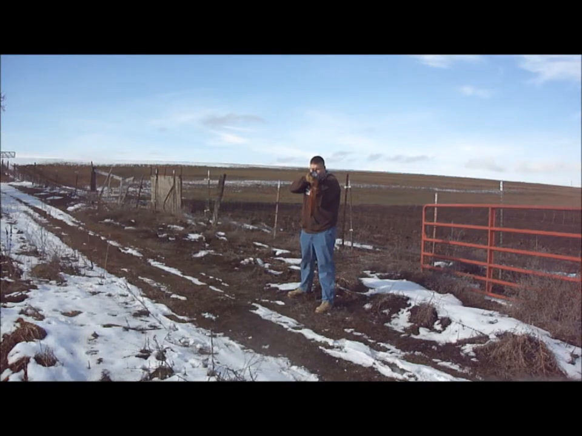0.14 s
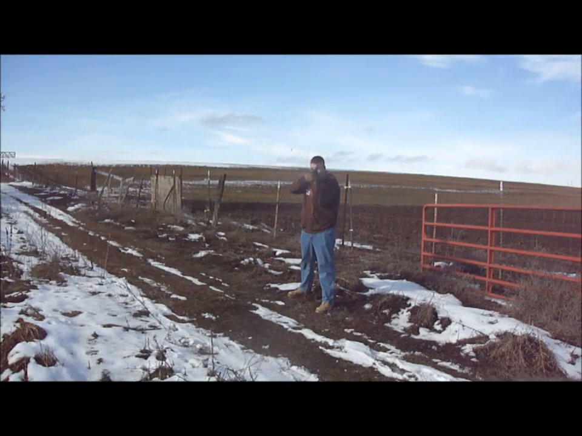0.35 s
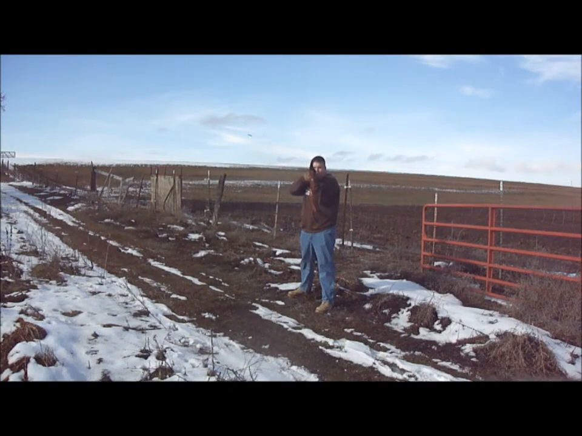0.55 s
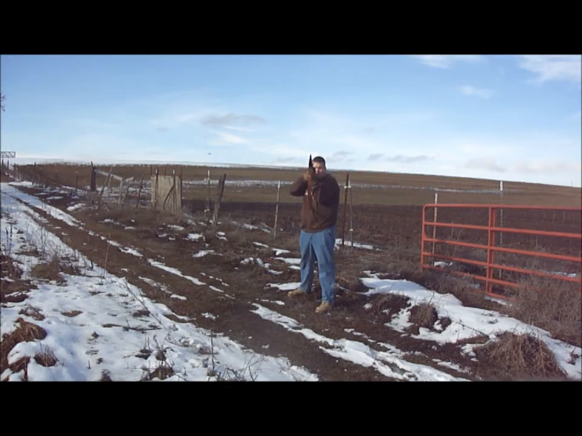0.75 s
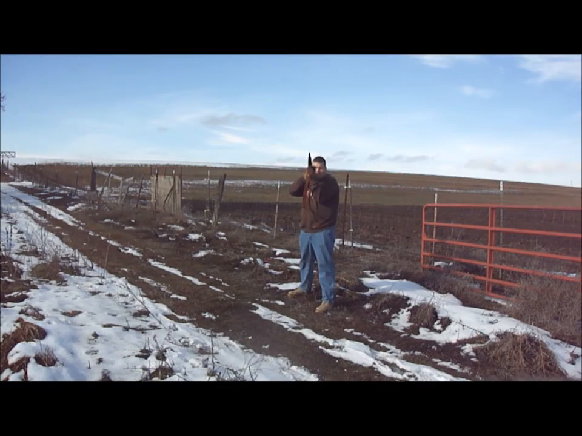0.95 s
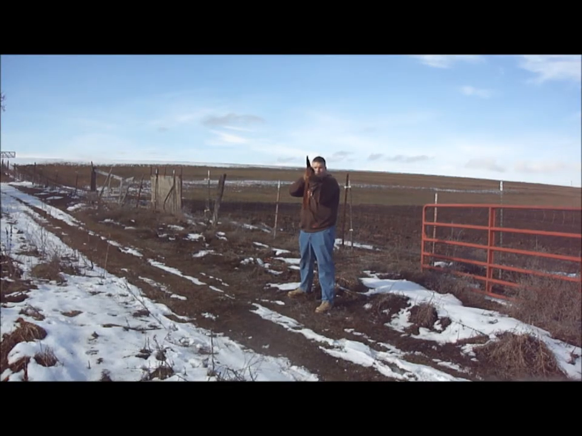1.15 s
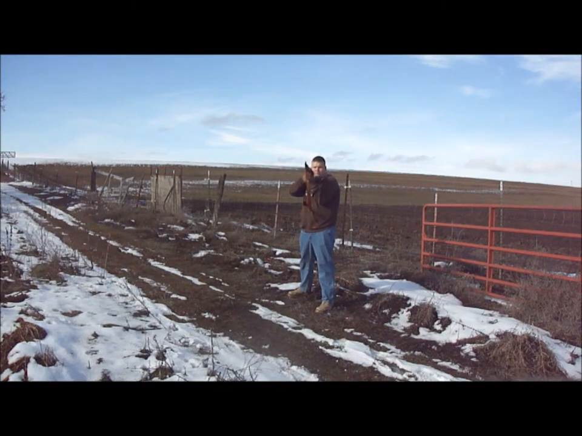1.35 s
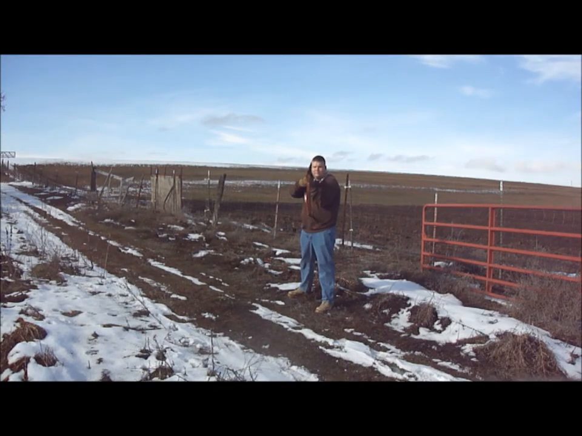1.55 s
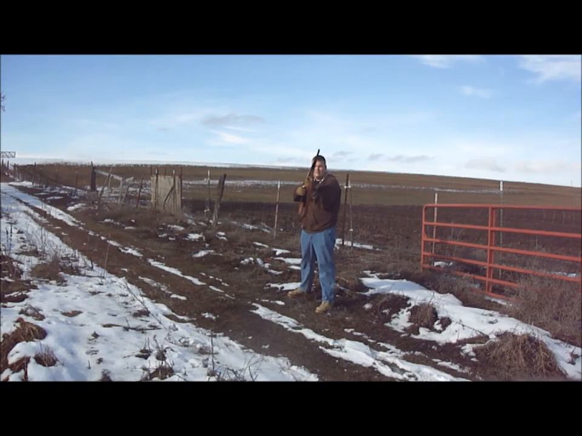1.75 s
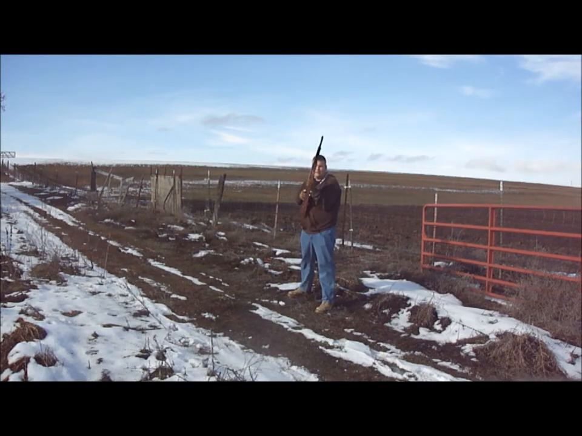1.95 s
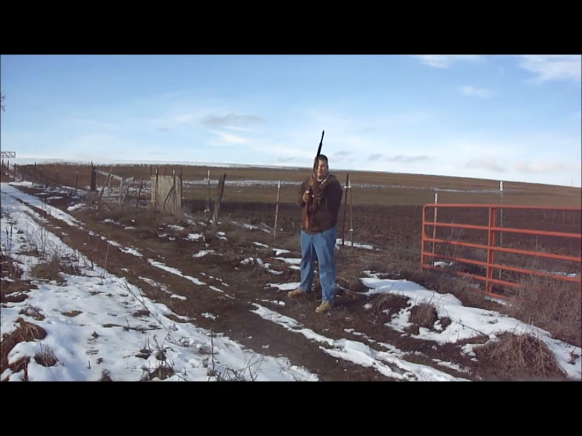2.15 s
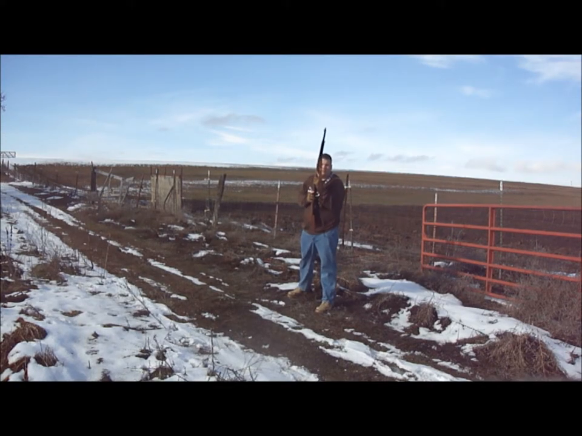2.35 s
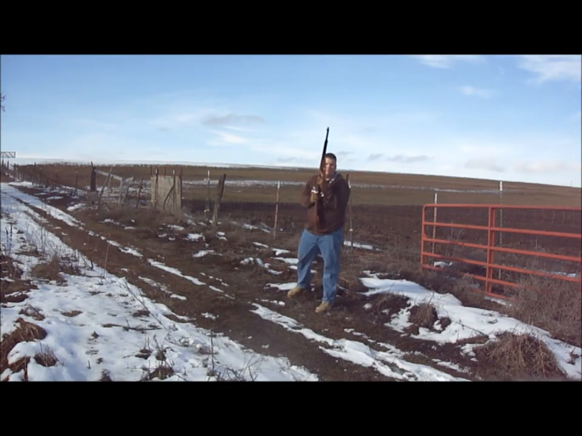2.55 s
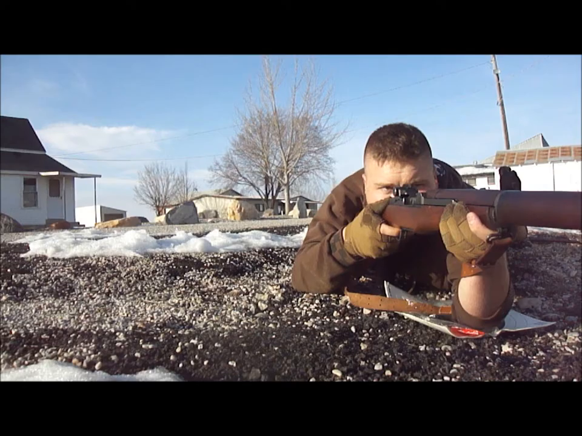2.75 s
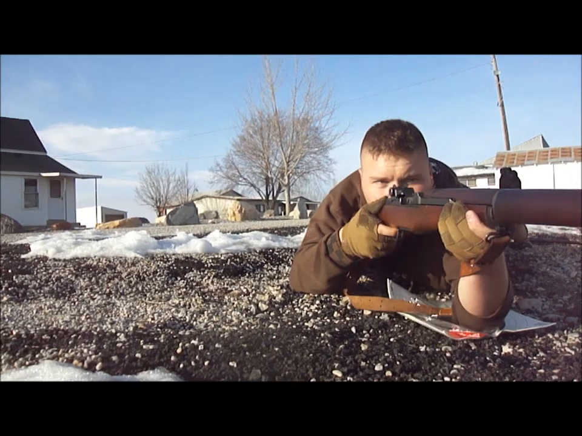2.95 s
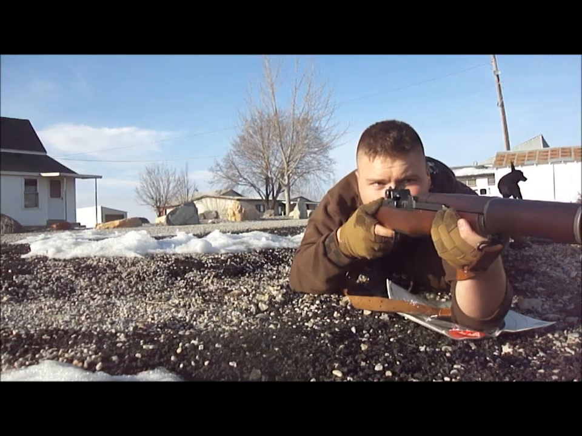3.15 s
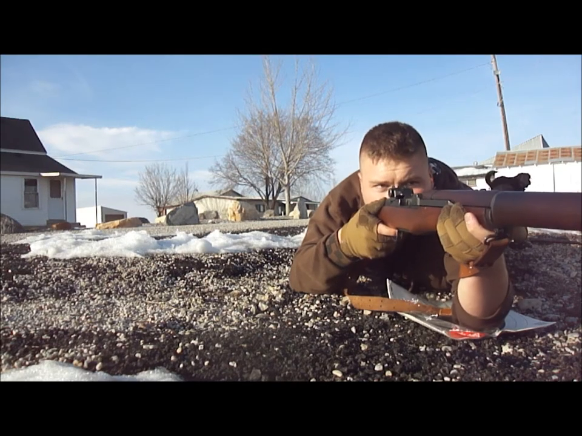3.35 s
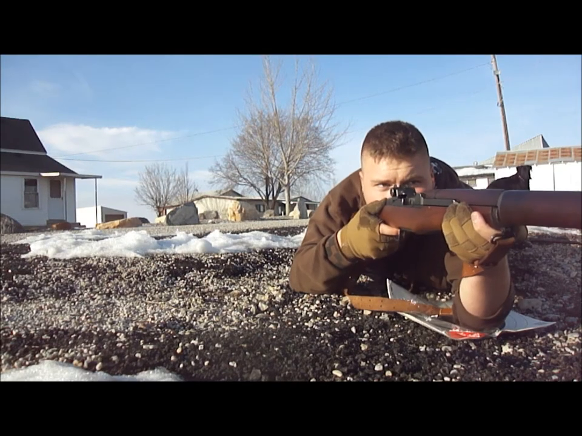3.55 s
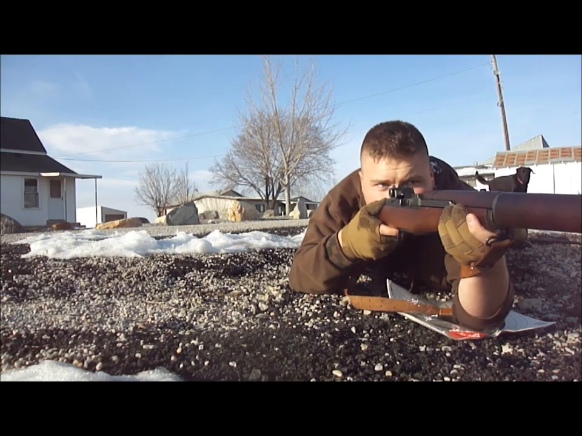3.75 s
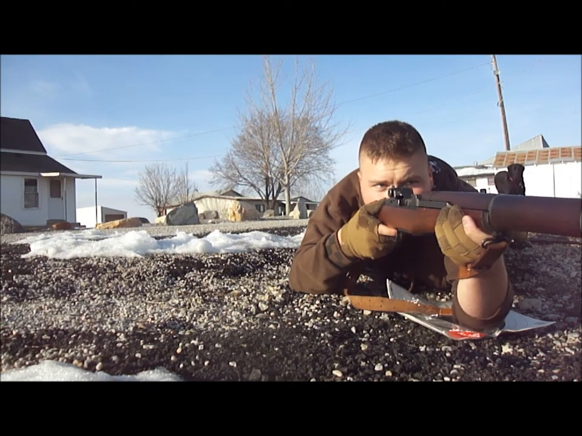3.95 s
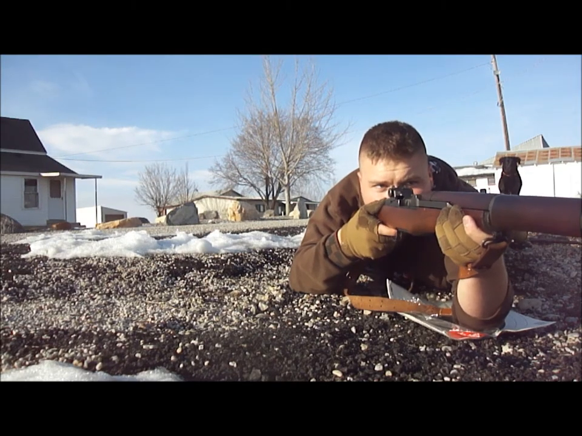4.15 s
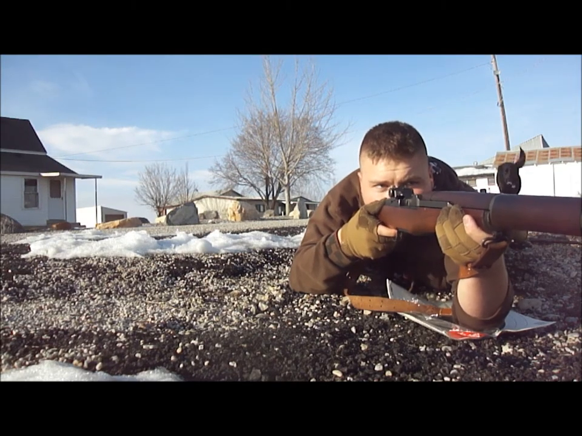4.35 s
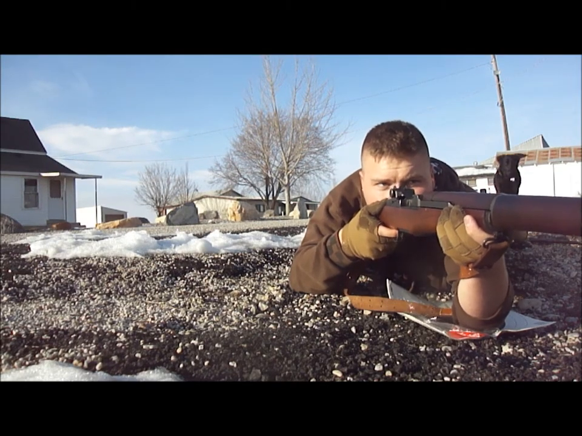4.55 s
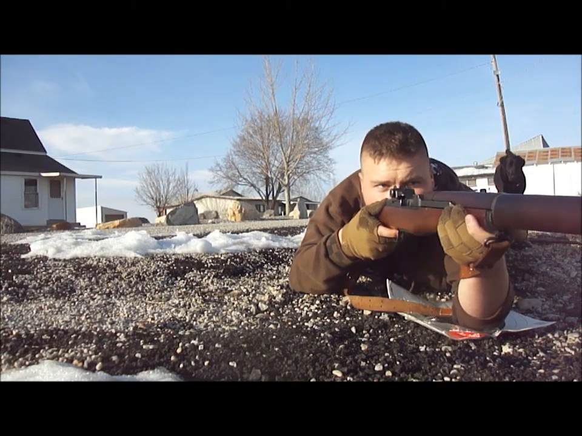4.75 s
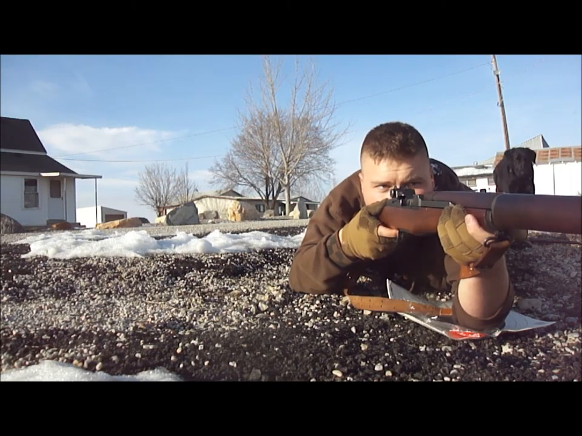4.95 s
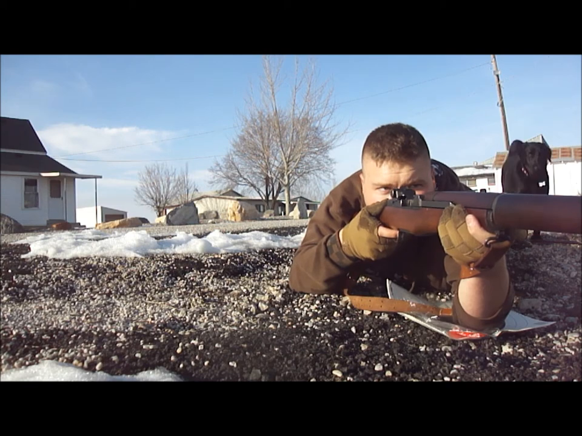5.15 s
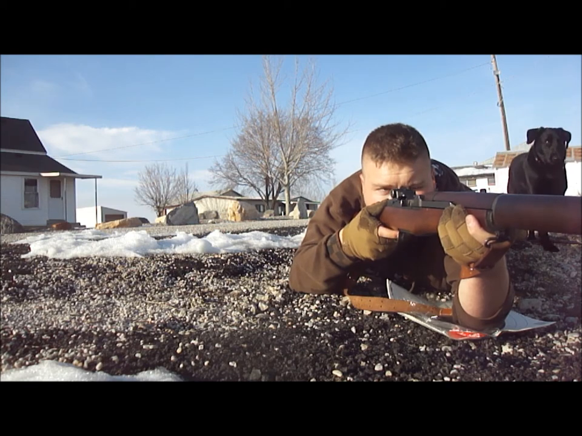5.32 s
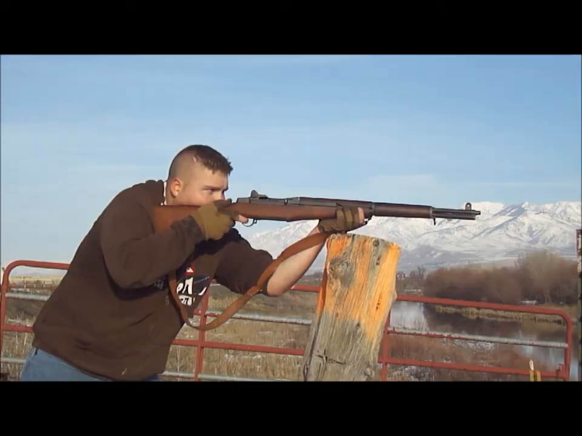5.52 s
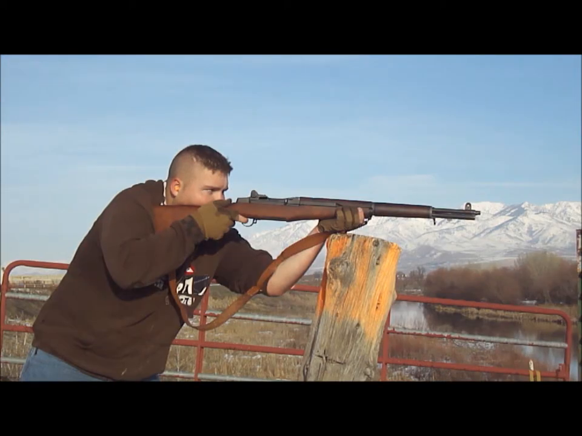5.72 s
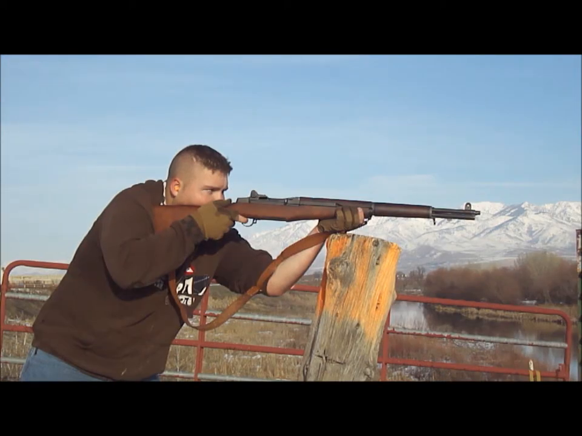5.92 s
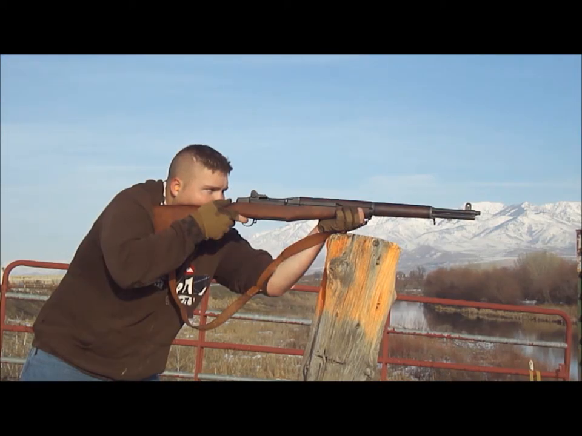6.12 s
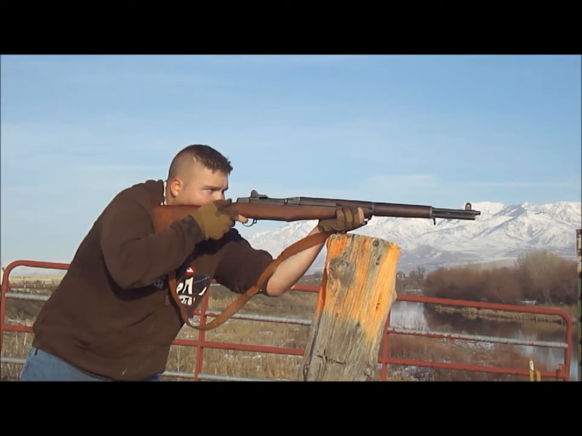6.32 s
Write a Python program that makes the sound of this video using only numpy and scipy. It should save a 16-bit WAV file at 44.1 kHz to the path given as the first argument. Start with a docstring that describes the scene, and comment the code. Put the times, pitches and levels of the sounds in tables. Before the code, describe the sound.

A sharp rifle crack echoes over fields with a ringing steel clip, then a second shot booms in a yard, casing bouncing, before near silence.

```python
"""Two rifle shots in open farmland

Heard from beside the rifle: a shot in the fields and one in a yard, joined by hard cuts, then a quiet field.
Each is a crack and a blast, made of noise bursts and N-waves; shaped noise rolls back from ground and hills.
After the first an empty steel cartridge clip pings away and lands, as wavering modes; after the second
nearby steel sings on and the brass case bounces on gravel by the microphone, as decaying sines.
Air puffs reach the microphone over faint open air; the recorder's limiter ducks after every loud peak."""
import sys
import numpy as np
from scipy import signal
from scipy.fft import rfft, irfft
from scipy.io import wavfile
from scipy.ndimage import uniform_filter1d

SR = 44100
rng = np.random.default_rng(int(sys.argv[2]) if len(sys.argv) > 2 else 0)


def waveform_to_disk(signal):
    """Save audio, clipped to [-1, 1], as 16-bit WAV at the path in sys.argv[1]."""
    frames = np.transpose(np.atleast_2d(signal))
    scaled = np.clip(frames, -1, 1) * 32767
    samples = np.round(scaled).astype(np.int16)
    wavfile.write(sys.argv[1], SR, samples)


N = 281358
TIME = np.arange(N) / SR
FREQS = np.maximum(np.fft.rfftfreq(N, 1 / SR), 1)

# Open air at the microphone, relative spectrum: (frequency [Hz], level [dB per Hz])
AIR_COLOUR = [(18, -41), (30, -28), (64, -4.5), (153, -5), (363, -5), (391, -3.5), (476, -3.5), (526, -5.5),
              (1410, -10.5), (2620, -15.5), (5910, -18.5), (11000, -21.5), (14200, -59), (22000, -120)]
AIR_DB, YARD_AIR_RISE_DB = -50.5, 0.5   # the air is slightly louder during the second take

# Puffs of air on the microphone, before their flutter: (time [s], level [dB], length [s])
PUFFS = [(0.065, -28, .068), (2.148, -45, 0.025), (2.583, -47, 0.055), (2.95, -27.5, 0.504),
         (5.535, -54, .028)]
# Relative spectrum of a puff: (frequency [Hz], level [dB per Hz])
PUFF_COLOUR = [(24, -47), (40, -37), (139, -2.5), (219, -2.5), (247, -1), (324, -4.5), (389, -15),
               (519, -18.5), (1500, -54), (1950, -99), (3300, -120)]
PUFF_ATTACK_S, PUFF_RELEASE_S = 0.0051, 0.018

# A soft knock on the camera; its mode: (frequency [Hz], level [dB], t60 [s])
KNOCK_S, KNOCK_MODE = 0.0775, (600, -10, 0.015)

# Bits of thrown gravel falling back: (time [s], level [dB])
GRAVEL = [(3.871, -28.5), (3.889, -27.5), (4.015, -34), (4.125, -33.5)]
GRAVEL_HZ, GRAVEL_DECAY_S = 7800, 0.0011

# (time [s], level [dB], centre frequency [Hz], decay [s])
CLICKS_AND_SCUFFS = [(1.235, -41, 8200, 0.015), (1.812, -39, 7000, 0.016), (1.847, -24.5, 5600, 0.0094),
                     (1.965, -42, 3640, .007), (2.428, -43, 3900, .003), (3.6204, 10, 9100, 0.00093),
                     (3.64, -34, 5500, 0.096), (4.899, -45, 7000, .0085), (5.086, -42, 2900, 0.048),
                     (5.348, -26.5, 4700, .0063), (5.881, -36, 6500, .0032)]

# Modes of each tick in a faint whirr, before the whirr level: (frequency [Hz], level [dB], t60 [s])
WHIRR_MODES = [(3600, 3.5, 0.018), (5700, 3, .012), (6800, 3, 0.0098), (7600, -3, .012)]
WHIRR_START_S, WHIRR_END_S, WHIRR_SWELL_S, WHIRR_DB = 2.2, 2.66, 0.28, -48

# Modes of the brass case, before the level of each bounce: (frequency [Hz], level [dB], t60 [s])
CASE_MODES = [(9250, -16, 0.073), (10030, 6.5, 0.027), (10300, -9, 0.18), (10900, -14, .06)]
# The case bounces and rolls: (time [s], level [dB])
CASE_HITS = [(3.62, -14), (3.707, -34), (3.727, -31), (3.751, -39), (3.7694, -28.5), (4.35, -42),
             (4.395, -47), (4.725, -45)]

# Steel set singing by the second blast: (frequency [Hz], level [dB], t60 [s])
STEEL_MODES = [(1569, -23.5, 5.8), (1661, -25.5, 6.4)]

# Modes of the steel cartridge clip, before the level of each ring: (frequency [Hz], level [dB], t60 [s])
CLIP_MODES = [(2383, 4, 1), (4079, 0.5, 1), (4988, -4.5, 0.34), (5077, -8.5, 1), (5090, -8, 0.68),
              (5570, -7, 0.91), (6360, -9, 0.14), (7060, -7, 0.37), (7630, -18, 0.74), (8000, -18, 0.3),
              (8430, -17.5, 1), (10100, -4.5, 0.17), (10300, -3, 0.33)]
# (time [s], level [dB], favoured frequency [Hz], spread [octaves], time until damped [s])
CLIP_RINGS = [(0.45, -19.5, 3980, 0.26, 0.16), (0.485, -15.5, 7820, 0.056, 0.15),
              (0.529, -25, 2430, 0.4, 0.078), (0.578, -12, 4950, .088, 0.045),
              (0.658, -23, 8060, 0.6, 0.17), (0.79, -9, 6350, 0.051, .032), (0.79, -12, 8400, 0.046, 0.038),
              (0.83, -15, 7100, 0.24, 0.18), (0.919, -22, 4760, 0.57, 0.18), (1.062, -24, 5070, .12, .1),
              (1.849, -36, 4640, 0.46, 0.095), (1.96, -51, 4600, .25, 0.17),
              (2.095, -27, 6400, 0.04, 0.018)]

# The two takes, the first in the fields and the second in the yard: (muzzle blast [s], end of take [s])
SHOT_TIMES = [(0.2823, 2.70), (2.808, 5.37)]
# Relative colour of the early echoes in the fields: (frequency [Hz], level [dB per Hz])
FIELD_COLOUR = [(24, -76), (40, -44), (164, -14.5), (256, -12), (419, -5), (624, 1), (1150, -1),
                (1290, -2.5), (1600, -4.5), (2610, -5), (4180, -12.5), (4700, -16), (5170, -18.5),
                (11000, -41), (14200, -74), (22000, -120)]
# Relative colour of the early echoes in the yard: (frequency [Hz], level [dB per Hz])
YARD_COLOUR = [(24, -68), (40, -41), (156, -5.5), (250, 1.5), (309, 1), (482, -3), (568, -6), (639, -6),
               (1180, -8), (1520, -5.5), (4080, -13.5), (4490, -13.5), (10200, -33.5), (11000, -37),
               (14200, -57), (22000, -120)]
# Sharp single slaps from walls and banks, before a common gain: (time [s], level [dB])
SLAPS = [(0.366, -2), (0.37, -12), (0.422, -7.5), (0.461, -4), (0.516, 1), (1.183, 1), (1.354, -13),
         (1.460, -7.5), (1.801, -14), (2.057, -11.5), (2.353, -22.5), (2.547, -25), (2.823, 2), (2.832, 1),
         (2.856, 4.5), (2.982, -15), (3.010, -2.5), (3.084, -4), (3.221, -8), (4.395, -17), (4.445, -16.5),
         (4.821, -21), (4.929, -20)]
SLAP_GAIN_DB = -11
# Smeared swells from slopes and tree lines, before the colouring: (time [s], level [dB], spread [s])
SWELLS = [(0.295, -10, .012), (0.369, -7.5, 0.0024), (0.521, -17.5, 0.011), (0.636, -11, 0.017),
          (0.721, -15.5, 0.016), (0.83, -17.5, 0.032), (1.14, -21.5, 0.055), (1.353, -23, 0.045),
          (1.465, -27.5, 0.048), (1.649, -25.5, 0.019), (1.709, -24, 0.0085), (1.79, -21.5, 0.015),
          (1.865, -24.5, 0.012), (2.023, -27.5, 0.027), (2.112, -28, 0.015), (2.272, -29, 0.015),
          (2.368, -34, 0.015), (2.46, -34.5, 0.023), (2.56, -37.5, 0.018), (2.69, -34, 0.0037),
          (2.827, -23, 0.016), (2.88, -11, 0.0045), (3.03, -24, 0.11), (3.298, -14, 0.011),
          (3.322, -15.5, .008), (3.509, -21, 0.021), (3.757, -22.5, .018), (3.91, -27.5, 0.018),
          (4.37, -32, 0.053)]
# The bullet's crack, the muzzle blast and their first spray off the ground:
# (time [s], level [dB], centre frequency [Hz], decay [s])
CRACKS = [(0.2752, -1, 4970, 0.00029), (0.2766, 5, 5300, 0.001), (0.2776, 0.5, 800, 0.00081),
          (0.286, -26, 5000, 0.0099), (2.806, -19.5, 5000, .006), (2.8136, 3, 1980, 0.00039),
          (2.875, -11, 5100, 0.012), (2.932, -12.5, 3950, 0.0059), (2.955, -18, 6000, .003)]

# Near ground scatter fades from the blast on. The far land answers after a delay, holds,
# then loses far_fall_db with every doubling of the travel time.
FIELD_ECHO = dict(near_db=-14, near_fade_db_per_s=34, far_db=-17.5,
                  far_delay_s=0.33, far_hold_s=0.7, far_fall_db=16.5)
YARD_ECHO = dict(near_db=-21, near_fade_db_per_s=9, far_db=-24,
                 far_delay_s=0.39, far_hold_s=0.56, far_fall_db=13.5)
FAR_RISE_S = 0.0081
# Treble loss [dB per kHz] at first, its growth and its limit; boom under 300 Hz relative to the roar.
FIELD_TONE = dict(first_loss_db=-2.0, loss_db_per_s=6, most_loss_db=9,
                  boom_db=-12, boom_fade_db_per_s=8, patchy_db=0.74)
YARD_TONE = dict(first_loss_db=-1.5, loss_db_per_s=5.5, most_loss_db=5,
                 boom_db=-11.5, boom_fade_db_per_s=0.5, patchy_db=2)
# The loss tilts the spectrum about the pivot and is even below the other frequency.
LOSS_PIVOT_HZ, LOSS_EVEN_HZ = 834, 605

MIC_LOW_CUT_HZ, TOP_CUT_HZ = 43, 11000


def from_db(db):
    """Decibels to gain."""
    return 10 ** (np.asarray(db) / 20)


def rms_one(x):
    """Scale to rms 1."""
    return x / np.sqrt(np.mean(x ** 2) + 1e-20)


def at_hz(points, hz):
    """Read a spectrum on a log-frequency axis."""
    f, db = np.transpose(points)
    return np.interp(np.log(hz), np.log(f), db)


def drift(rate):
    """Smooth chance with rms 1, taking a new direction rate times a second."""
    knots = rng.standard_normal(N // 20)
    return rms_one(np.interp(TIME * rate, np.arange(len(knots)), knots))


def noise(spectrum):
    """Noise of a given colour, rms 1."""
    white = rfft(rng.standard_normal(N))
    return rms_one(irfft(white * from_db(at_hz(spectrum, FREQS)), N))


def add(track, s, sound):
    """Mix a sound into a track at time s."""
    start = int(round(s * SR))
    track[start:start + len(sound)] += sound[:N - start]


def ring(modes, t):
    """Decaying sines of a struck object, in chance phases."""
    return sum(from_db(db - 60 * t / t60) * np.sin(2 * np.pi * (hz * t + rng.random()))
               for hz, db, t60 in modes)


def gate(start, end):
    """Open between two times, with millisecond edges."""
    opening = np.clip((TIME - start) / 0.001, 0, 1)
    closing = np.clip((end - TIME) / 0.001, 0, 1)
    return opening * closing


def bursts(rows, half_octaves=1.13):
    """Short broad noise bursts, each band-passed about its centre and dying exponentially."""
    out, t = np.zeros(N), TIME[:SR // 5]
    for s, db, hz, decay in rows:
        low, high = hz / 2 ** half_octaves, min(hz * 2 ** half_octaves, 0.45 * SR)
        width_gain = np.sqrt(SR / 2 / (high - low))   # makes up for what the band leaves out
        burst = rng.standard_normal(len(t)) * np.exp(-t / decay) * width_gain
        band = signal.butter(2, [low, high], "band", fs=SR, output="sos")
        add(out, s, from_db(db) * signal.sosfilt(band, burst))
    return out


def wind(lumpy_db=4.0):
    """Each low puff rises, holds, flutters and dies away on the microphone, over steady open air."""
    push = np.zeros(N)
    for s, db, length in PUFFS:
        t = np.maximum(TIME - s, 0)
        rise = 1 - np.exp(-t / PUFF_ATTACK_S)
        fall = np.exp(-np.clip((t - length) / PUFF_RELEASE_S, 0, 20))
        push += from_db(db) * rise * fall
    puffs = push * from_db(lumpy_db * drift(40)) * noise(PUFF_COLOUR)
    second_take = gate(SHOT_TIMES[0][1], SHOT_TIMES[1][1])
    air = from_db(AIR_DB + YARD_AIR_RISE_DB * second_take) * noise(AIR_COLOUR)
    return puffs + air


def knock(contact_s=0.0013):
    """A soft touch sets the camera body ringing for a few cycles."""
    out, t = np.zeros(N), TIME[:SR // 10]
    soft_start = 1 - np.exp(-(t / contact_s) ** 2)
    add(out, KNOCK_S, ring([KNOCK_MODE], t) * soft_start)
    return out


def whirr(per_s=58, jitter_s=0.00031):
    """A faint quick whirring, perhaps a zoom motor or a bird: nearly even high ticks that swell up."""
    out = np.zeros(N)
    for s in np.arange(WHIRR_START_S, WHIRR_END_S, 1 / per_s):
        swell = min((s - WHIRR_START_S) / WHIRR_SWELL_S, 1)
        tick = ring(WHIRR_MODES, TIME[:SR // 30])
        add(out, s + rng.normal(0, jitter_s), from_db(WHIRR_DB) * swell * tick)
    return out


def gravel():
    """Small stones tick on the ground as bursts of one colour and decay."""
    return bursts([(s, db, GRAVEL_HZ, GRAVEL_DECAY_S) for s, db in GRAVEL])


def clicks_and_scuffs():
    return bursts(CLICKS_AND_SCUFFS)


def spent_case():
    """The brass case's modes tinkle at every bounce."""
    out = np.zeros(N)
    for s, db in CASE_HITS:
        add(out, s, from_db(db) * ring(CASE_MODES, TIME[:SR // 4]))
    return out


def singing_steel(swell_s=0.18, waver_db=2):
    """Two close tones build up under the second blast and fade slowly, wavering."""
    out, t = np.zeros(N), TIME[:3 * SR]
    for mode in STEEL_MODES:
        build_up = 1 - np.exp(-t / swell_s)
        waver = from_db(waver_db * drift(26)[:len(t)])
        add(out, SHOT_TIMES[1][0], ring([mode], t) * build_up * waver)
    return out * gate(*SHOT_TIMES[1])


def cartridge_clip(rise_s=0.01, damping_s=0.0079, tumble_db=4.5, doppler=0.00127):
    """Each turn or touch brings out a group of modes; spinning makes each swell and bend on its own."""
    out, t = np.zeros(N), TIME[:SR // 2]
    for hz, mode_db, t60 in CLIP_MODES:
        swing = np.zeros(N)
        for s, db, favoured_hz, spread, held in CLIP_RINGS:
            off_favoured = np.log2(hz / favoured_hz) / spread
            level_db = db + mode_db - 2.5 * off_favoured ** 2 - 60 * t / t60
            rise = 1 - np.exp(-t / rise_s)
            damped = np.exp(-np.maximum(t - held, 0) / damping_s)
            add(swing, s, from_db(level_db) * rise * damped)
        phase = 2 * np.pi * hz * np.cumsum(1 + doppler * drift(72.2)) / SR
        out += swing * from_db(tumble_db * drift(29.23)) * np.sin(phase)
    return out


def echo_level(age, near_db, near_fade_db_per_s, far_db, far_delay_s, far_hold_s, far_fall_db):
    """Strength of the roar: near ground, far land and the swells from single slopes add in power."""
    near = from_db(near_db - near_fade_db_per_s * age)
    doublings = np.log2(np.maximum(age / far_hold_s, 1))
    far_rise = np.clip((age - far_delay_s) / FAR_RISE_S, 0, 1)
    far = from_db(far_db - far_fall_db * doublings) * far_rise
    swell_power = sum(from_db(db) ** 2 * np.exp(-0.5 * np.minimum(((TIME - s) / spread) ** 2, 100))
                      for s, db, spread in SWELLS)
    return np.sqrt(near ** 2 + far ** 2 + swell_power)


def reflections(level, lumpy_db, distinct_per_s, distinct_db, rounded_hz):
    """Countless reflections of the blast arrive in clumps; a few stand out alone as rounded pops."""
    clumps = rms_one(from_db(lumpy_db * (0.59 * drift(110) + drift(400))))
    dense = clumps * rng.standard_normal(N)
    distinct = rms_one((rng.random(N) < distinct_per_s / SR) * rng.standard_normal(N))
    rounding = signal.butter(2, rounded_hz, fs=SR, output="sos")
    pops = signal.sosfilt(rounding, distinct)
    share = from_db(distinct_db)
    return level * (dense + share * pops) / np.sqrt(1 + share ** 2)


def slaps(width_s, scatter_db, gather_s, scatter_s):
    """Each reflector returns the blast's N-shaped wave inside a short spray of scatter."""
    out, t = np.zeros(N), TIME[:SR // 10] - TIME[SR // 20]
    n_wave = (1 - 2 * t / width_s) * (t >= 0) * (t < width_s)
    spray = from_db(scatter_db) * np.exp(np.minimum(t / gather_s, -t / scatter_s))
    for s, db in SLAPS:
        add(out, s + t[0], from_db(db) * (n_wave + spray * rng.standard_normal(len(t))))
    return out


def rolling_echo(arrivals, age, colour, first_loss_db, loss_db_per_s, most_loss_db,
                 boom_db, boom_fade_db_per_s, patchy_db):
    """The land colours the reflections; with travel time they lose boom and, up to a limit, treble."""
    loss_per_khz = np.minimum(first_loss_db + loss_db_per_s * age, most_loss_db)
    # the colour is scaled by the power of the roar, 300-1500 Hz
    power = from_db(at_hz(colour, FREQS)) ** 2
    roar_share = np.mean(power * (FREQS > 300) * (FREQS < 1500))
    low_share = np.mean(power * (FREQS < 300))
    boom = boom_db - boom_fade_db_per_s * age - 10 * np.log10(low_share / roar_share)
    coloured = rfft(arrivals) * np.sqrt(power / roar_share)
    out = 0
    # overlapping bands two thirds of an octave apart, each with its own moving gain
    for hz in 25 * 2 ** np.arange(0, 9.5, 2 / 3):
        overlap = np.maximum(1 - 1.5 * np.abs(np.log2(FREQS / hz)), 0)
        band = irfft(coloured * overlap, N)
        bass = 1 / (1 + (hz / 330) ** 6)
        absorbed = loss_per_khz * (max(hz, LOSS_EVEN_HZ) - LOSS_PIVOT_HZ) / 1000
        out = out + band * from_db(bass * boom - absorbed + patchy_db * drift(25.033))
    return out


def shot_echoes():
    """Slaps and rolling echoes of both blasts, each cut off at the end of its take."""
    single = from_db(SLAP_GAIN_DB) * slaps(width_s=0.00085, scatter_db=-1, gather_s=0.00027, scatter_s=0.0045)
    places = (FIELD_ECHO, FIELD_COLOUR, FIELD_TONE), (YARD_ECHO, YARD_COLOUR, YARD_TONE)
    out = 0
    for (start, end), (echo, colour, tone) in zip(SHOT_TIMES, places):
        age = np.maximum(TIME - start, 0)
        level = echo_level(age, **echo)
        dense = reflections(level, lumpy_db=1.87, distinct_per_s=90, distinct_db=-4, rounded_hz=1490)
        out = out + rolling_echo(dense + single, age, colour, **tone) * gate(start, end)
    return out


def cracks():
    """The bullet's crack and the muzzle blast reach the microphone as very short noise bursts."""
    return bursts(CRACKS)


def scene():
    """Shots, metal and small ground sounds over faint open air."""
    ambience = wind() + knock() + whirr()
    small_sounds = gravel() + clicks_and_scuffs()
    metal = spent_case() + singing_steel() + cartridge_clip()
    return (ambience + small_sounds + metal + shot_echoes() + cracks())[None]


def limiter(x, threshold_db, release_db_per_s, attack_s):
    """The gain drops just after a loud peak and climbs back at a steady rate."""
    power = np.abs(uniform_filter1d(x ** 2, size=44))   # averaged over a millisecond
    level_db = 10 * np.log10(power + 1e-12)
    excess_db = np.maximum(level_db - threshold_db, 0)
    climb = release_db_per_s * TIME
    duck_db = np.maximum.accumulate(excess_db + climb, axis=-1) - climb
    r = np.exp(-1 / (attack_s * SR))
    return x * from_db(-signal.lfilter([1 - r], [1, -r], duck_db))


def record(dry):
    """Limiter, overload on what slips past it, a gentle low cut and a steep top cut."""
    limited = limiter(dry, threshold_db=-6.5, release_db_per_s=115, attack_s=0.00028)
    overloaded = np.clip(limited, -0.85, 0.85)
    low_cut = signal.butter(2, MIC_LOW_CUT_HZ, "high", fs=SR, output="sos")
    top_cut = signal.ellip(12, 0.2, 90, TOP_CUT_HZ, fs=SR, output="sos")
    return signal.sosfilt(top_cut, signal.sosfilt(low_cut, overloaded))


dry = scene()
out = record(dry)
waveform_to_disk(out)
```